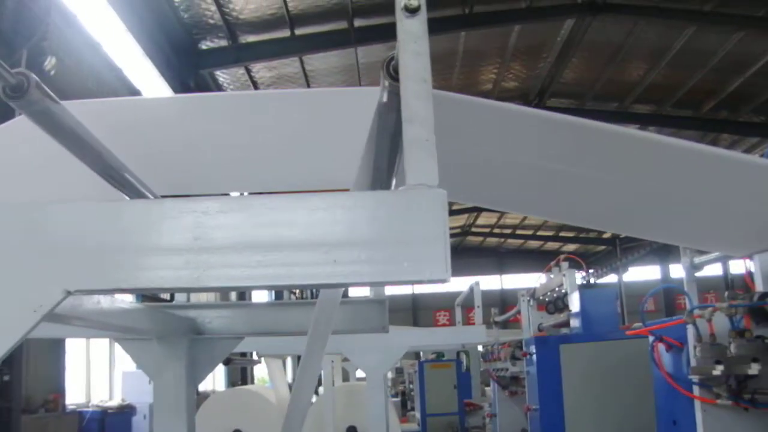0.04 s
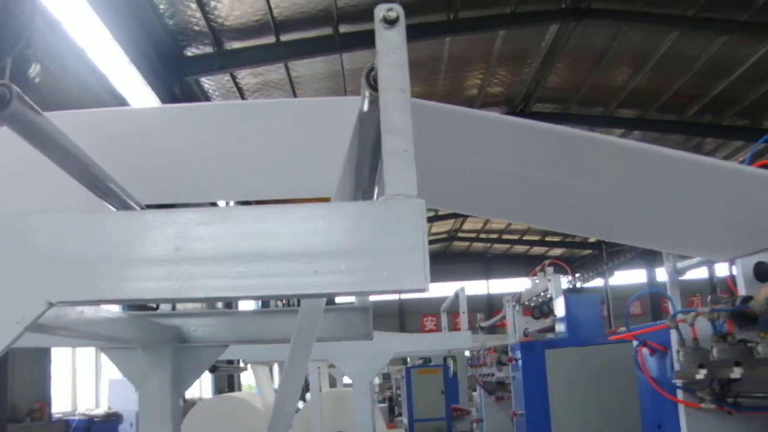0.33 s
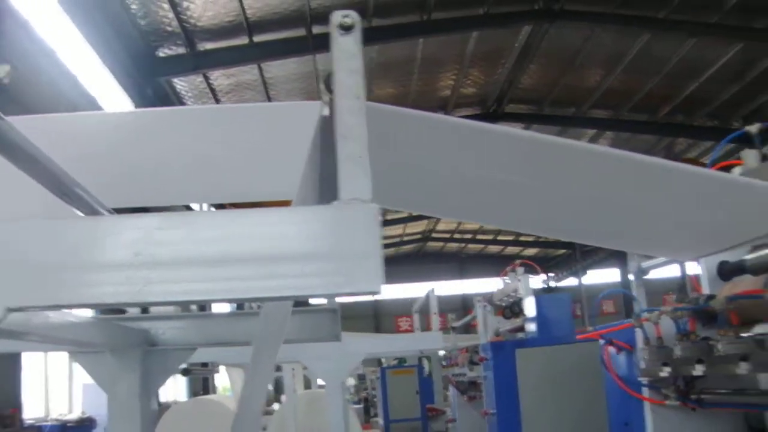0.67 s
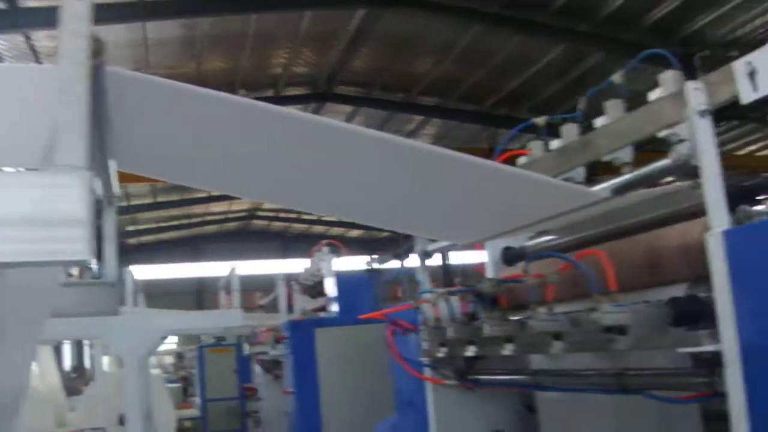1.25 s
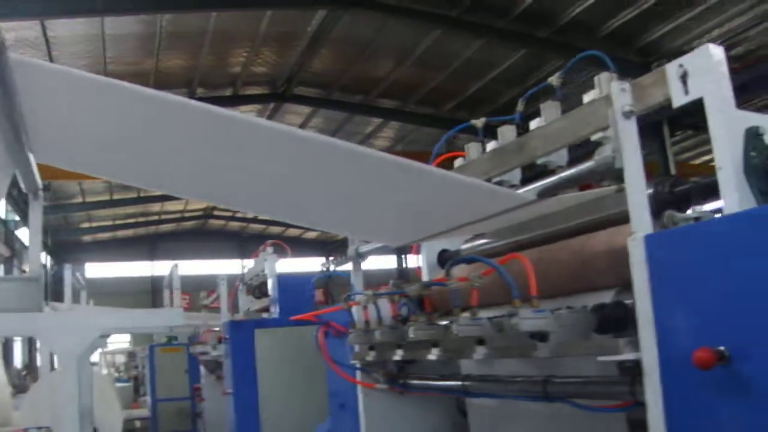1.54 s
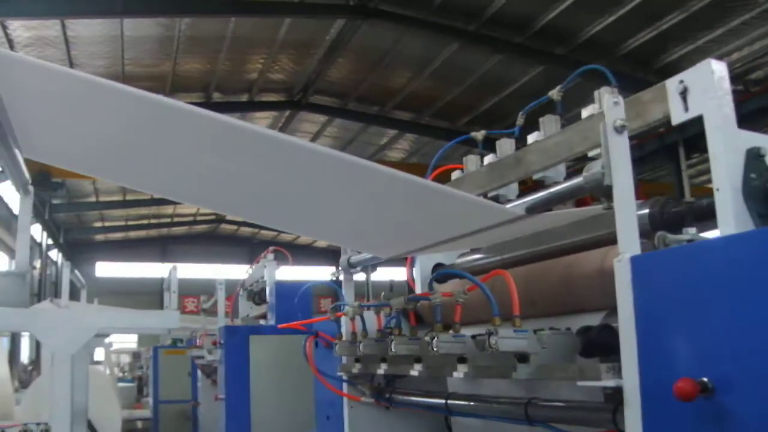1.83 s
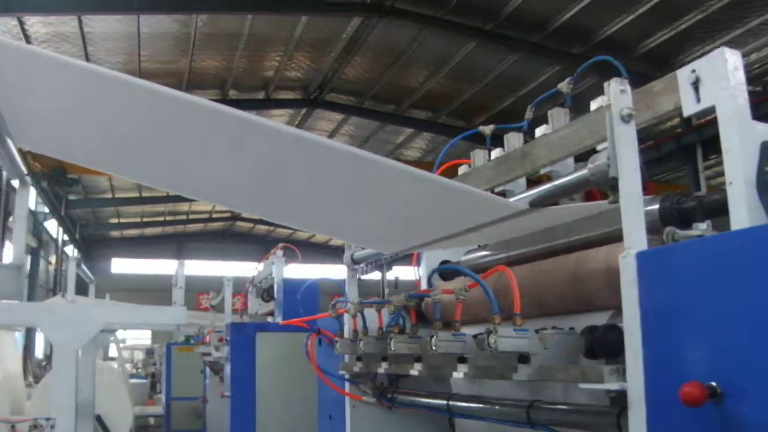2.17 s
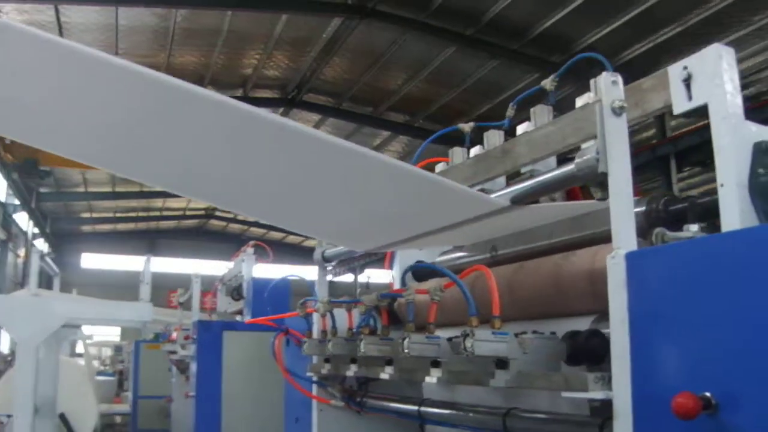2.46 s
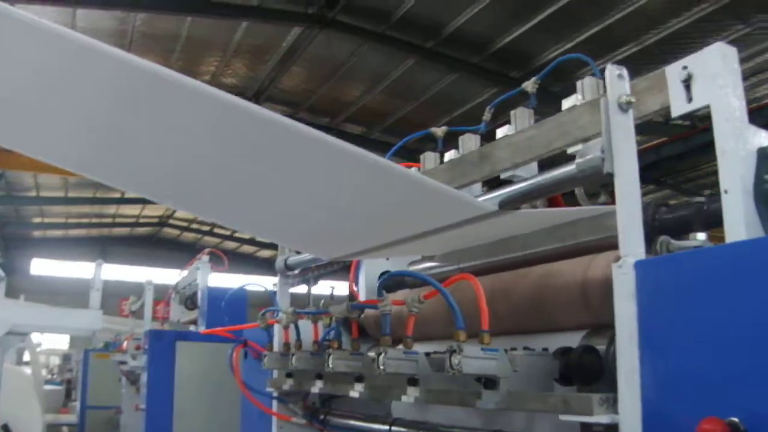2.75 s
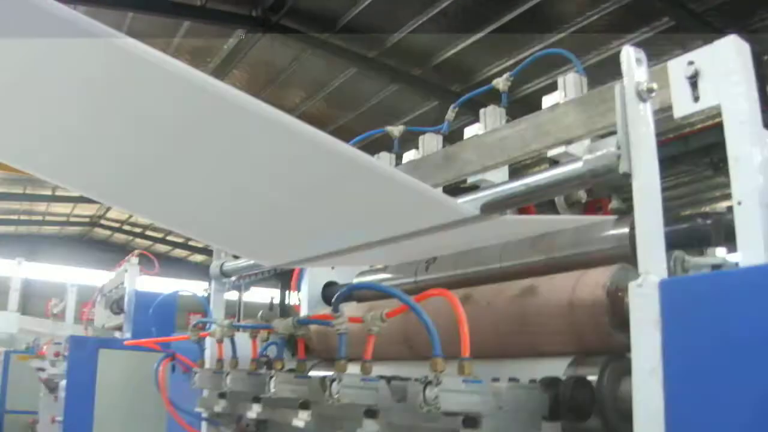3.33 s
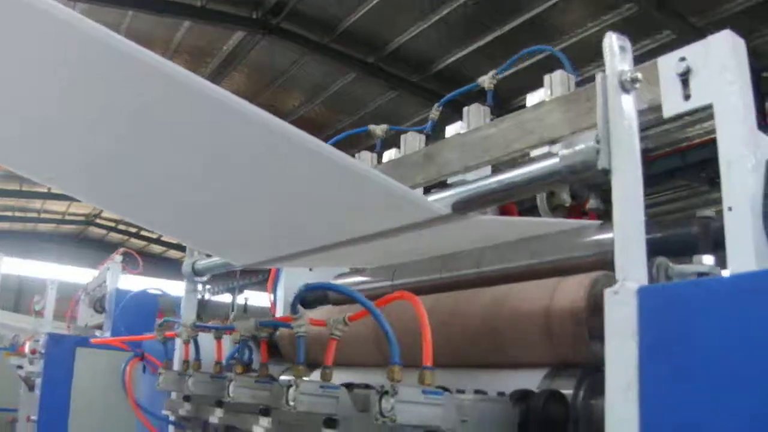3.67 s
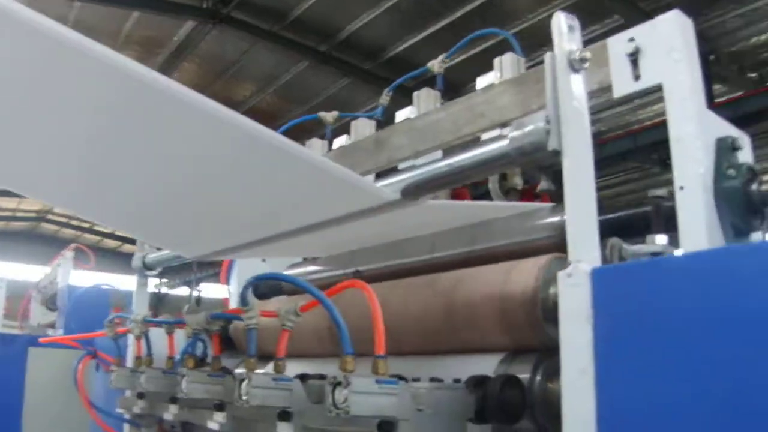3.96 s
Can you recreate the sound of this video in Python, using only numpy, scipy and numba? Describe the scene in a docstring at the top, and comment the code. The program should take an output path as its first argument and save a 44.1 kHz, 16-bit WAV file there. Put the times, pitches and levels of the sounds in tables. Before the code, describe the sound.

A paper processing machine drones in a factory hall throughout, with a low pulsing hum, gear whine and rushing paper that faintly rustles and squeaks. Air valves chirp softly around 1 and 2.9 seconds; one sharp chirp at 1.7 seconds briefly dips the overall level. From about 3 seconds the microphone nears the rollers and the buzz brightens, with small air puffs and a faint tick near 3.5 seconds.

```python
"""A pulsing drone over a steady rush: a tissue machine runs in a factory hall.
The drive pulses three times a shaft turn, and its harmonic buzz brightens as the microphone nears
the rollers. Meshing gears whine, other motors hum, the paper web rushes, rustles and squeaks.
Air valves give tiny chirps and puffs; one sharp chirp makes a gain control duck for a moment."""
import sys
import numpy as np
from scipy import signal
from scipy.fft import rfft, irfft
from scipy.io import wavfile
from scipy.ndimage import map_coordinates
from numba import njit

SR = 44100
rng = np.random.default_rng(int(sys.argv[2]) if len(sys.argv) > 2 else 0)


def transcribe(signal):
    """Save signal, clipped to [-1, 1], as a 16-bit WAV file at the path in sys.argv[1]."""
    frames = np.atleast_2d(signal).T
    limited = np.clip(frames, -1, 1)
    pcm = np.round(limited * 32767).astype(np.int16)
    wavfile.write(sys.argv[1], SR, pcm)


N = 176400

# spectrum of the paper web and the hall (frequency [Hz], relative density [dB])
RUSH_SPECTRUM = [(20, -11), (45, -1), (80, -0.5), (150, 1.5), (300, 1), (430, -2.5), (520, -3), (700, -0.5),
                 (880, -1.5), (1100, -6.5), (1500, -4.5), (2000, -4), (2800, -6), (3400, -8), (3900, -8.5),
                 (4400, -10.5), (5300, -11), (7000, -16.5), (9000, -21), (10500, -21.5), (11600, -21.5),
                 (15500, -34)]
# swells of the rush (time [s], body gain [dB], treble gain [dB])
RUSH_GAIN = [(0, -1, -2), (.19, -1.5, 0), (.32, -1.5, 0.5), (.55, -1.5, -1.5), (.82, 0, -1),
             (1.08, -1.5, -1), (1.3, -0.5, -3), (1.47, -0.5, 2), (1.62, -0.5, 0), (1.9, 2, -0.5),
             (2.1, 1.5, 2), (2.45, 1, 0), (2.7, 1.5, 2.5), (3.08, 1.5, 1.5), (3.25, 3.5, 6.5), (3.55, 2, 2),
             (3.72, 2.5, 1), (3.85, 4, 6), (4, 2, 5)]
# the paper's highest hiss, relative to the treble (time [s], gain [dB])
TOP_HISS_GAIN = [(0, -0.5), (.65, -1), (.85, 2.5), (1.1, -0.5), (1.42, 1), (1.7, 0.5), (2.0, -1.5),
                 (2.15, 2), (2.45, 0), (3.05, -0.5), (3.3, 0.5), (3.65, -1.5), (3.85, 0.5), (4, -0.5)]
# rustles of the paper (start [s], duration [s], crest level [dB])
PAPER_RUSTLES = [(0.163, .06, -37.5), (1.038, .08, -37), (1.45, 0.048, -38.5), (2.287, 0.076, -36),
                 (2.84, 0.052, -40), (3.192, 0.044, -35.5), (3.27, .05, -35)]
# squeaks of the rollers (start [s], duration [s], frequency [Hz], crest level [dB])
ROLLER_SQUEAKS = [(.58, 0.3, 5170, -50), (1.18, 0.2, 11800, -65), (1.79, 0.045, 10080, -50),
                  (1.99, 0.057, 5600, -42), (2.14, .15, 12550, -56), (2.59, .07, 4800, -45),
                  (2.74, .07, 4700, -47), (3.456, .06, 3990, -40), (3.59, 0.076, 10300, -45)]
# dry tick of the mechanism (start [s], initial level [dB])
MECHANISM_TICKS = [(3.6147, -27)]
# valve chirps (start [s], initial frequency [Hz], peak level [dB])
VALVE_CHIRPS = [(1.006, 9050, -28.5), (1.016, 8500, -28.5), (1.021, 11600, -33), (1.641, 8300, -33),
                (1.657, 8840, -7.5), (2.861, 9200, -26), (2.869, 8500, -23.5), (2.8745, 11600, -26)]
# puffs of air (start [s], duration [s], centre [Hz], bandwidth [Hz], crest level [dB])
AIR_PUFFS = [(0.132, 0.037, 5960, 4000, -41), (1.635, 0.014, 7600, 3000, -36.5),
             (2.262, 0.028, 8000, 5000, -41.5), (3.426, 0.022, 5800, 2800, -33),
             (3.44, 0.032, 8000, 5500, -36.5)]
# tones of neighbouring motors and rollers (frequency [Hz], base level [dB])
MOTOR_TONES = [(69.8, -49), (96.5, -50.5), (120.5, -55.5), (193.2, -48.5), (264, -54), (340, -53.5),
               (888.4, -46.5), (913.2, -47)]
# gear tones, in clusters spaced by the shaft rate (frequency [shaft rates], base level [dB])
MESH_TONES = [(107, -64.5), (111, -49), (112, -51), (113, -53.5), (114, -51), (152, -59), (162, -55),
              (168, -65.5)]
# swells of the gear tones (time [s], gain [dB])
MESH_GAIN = [(0, -3), (.3, -2), (.7, 1.5), (1.25, -1), (1.6, -3), (1.95, 4.5), (2.4, -1.5), (2.7, -1),
             (3.2, 5), (3.45, -2), (3.8, 3.5), (4, -6)]
# the brightest whine and its sidebands (frequency [shaft rates], relative level [dB])
WHINE_TONES = [(119, -5), (120, 1.5), (121, -10), (122, -9.5)]
# swells of that whine (time [s], reference level [dB])
WHINE_SWELL = [(0, -51.5), (.9, -53.5), (1.05, -48.5), (1.28, -45.5), (1.6, -53), (1.9, -44.5), (2.15, -46),
               (2.65, -42), (3.15, -47), (3.45, -47), (3.8, -43.5), (4, -47)]
# path of the microphone (time [s], place [0 far, 1 midway, 2 near])
MIC_PATH = [(0, 0.035), (1.7, 0.1), (2.6, 0.77), (3.05, 0.8), (3.3, 2), (4, 2)]
# the drive's harmonics at those three places (frequency [pulse rates], relative level [dB])
FAR_HARMONICS = [(1, -30.5), (2, -16), (3, -28.5), (4, 0), (5, -32), (6, -33), (7, -39), (8, -29), (9, -41),
                 (10, -23), (11, -25), (12, -25), (13, -30), (14, -35), (15, -65)]
MIDWAY_HARMONICS = [(1, -24), (2, -12), (3, -28), (4, 0), (5, -27.5), (6, -36), (7, -45), (8, -23.5),
                    (9, -17.5), (10, -17.5), (11, -15), (12, -22), (13, -22.5), (14, -21), (15, -38)]
NEAR_HARMONICS = [(1, -22), (2, -5), (3, -20), (4, 0), (5, -25), (6, -23.5), (7, -31), (8, -18.5), (9, -18),
                  (10, -23), (11, -9), (12, -18), (13, -20), (14, -28), (15, -27)]
# harmonics 2 (hum) and 4 (drone) swell and fade in the hall's standing waves (time [s], level [dB])
HUM_LEVEL = [(0, -28), (1.05, -30.5), (1.25, -31.5), (1.5, -29.5), (2.2, -29.5), (2.85, -27), (3.0, -28.5),
             (3.18, -25.5), (3.55, -26.5), (3.8, -23), (4, -24)]
DRONE_LEVEL = [(0, -13), (.7, -13.4), (.92, -14), (1.1, -12.5), (1.42, -14.5), (1.6, -16.5), (2.0, -12),
               (2.17, -13.5), (2.33, -13.5), (2.62, -15.5), (2.78, -18), (2.92, -17.5), (3.45, -20.5),
               (3.62, -19.5), (3.75, -17.5), (4, -19)]

SHAFT_HZ, PULSES_PER_TURN = 24.127, 3
TIME = np.arange(N) / SR
BIN_HZ = np.arange(N // 2 + 1) * SR / N


def undb(db):
    """Amplitude grows tenfold for every 20 dB."""
    return 10 ** (np.asarray(db) / 20)


def unit_rms(x):
    """Normalisation to unit power."""
    return x / np.sqrt(np.mean(x ** 2))


def curve(table):
    """Linear interpolation of a table's columns over time."""
    at, *columns = np.array(table, float).T
    return np.squeeze([np.interp(TIME, at, column) for column in columns])


def drift(rate_hz):
    """Slow random modulation: a cubic spline through random knots, spread near 1."""
    knots = rng.standard_normal(int(rate_hz * N / SR) + 8)
    coarse_time = TIME[::100]
    spline = map_coordinates(knots, [coarse_time * rate_hz + 2 + rng.random()], order=3)
    return 1.13 * np.interp(TIME, coarse_time, spline)


def band_noise(hz, width_hz):
    """Band-pass filtering: white noise under a bell-shaped response, rms 1."""
    rolloff = 1 + (3.1 * (BIN_HZ - hz) / width_hz) ** 4
    return unit_rms(irfft(rfft(rng.standard_normal(N)) / rolloff, N))


def swish(start, length, hz, width_hz, db):
    """A noise burst: one band swells and fades under a half-sine envelope."""
    envelope = np.sin(np.pi * np.clip((TIME - start) / length, 0, 1))
    return undb(db) * envelope * band_noise(hz, width_hz)


def tone(cycles, db, flutter_db, wander_rad):
    """Amplitude and phase modulation: a partial wavers in the hall."""
    amplitude = np.sqrt(2) * undb(db + flutter_db * drift(6.12))
    return amplitude * np.sin(2 * np.pi * cycles + wander_rad * drift(4.066))


@njit
def peak_hold(x, release_s):
    """Peak detection: an instant rise and an exponential release."""
    fall = np.exp(-1 / (release_s * SR))
    out, held = np.empty(len(x)), 0.
    for i in range(len(x)):
        held = max(x[i], held * fall) + 1e-18
        out[i] = held
    return out


def hall(direct, t60_s=0.7, tail_db=-33):
    """Reverberation: a diffuse, exponentially decaying tail joins the direct sound."""
    tail = rng.standard_normal(N) * np.exp(-np.log(1000) * TIME / t60_s)
    return direct + undb(tail_db) * signal.fftconvolve(direct, tail / np.linalg.norm(tail))[:N]


def paper_web(shaft_turns, base_db=-33, body_hz=3060, treble_hz=8000, top_hiss_hz=10000):
    """Modulated noise of running paper: third-octave bands swell together and flicker alone."""
    freqs = np.maximum(BIN_HZ, 1)
    at_hz, density_db = np.array(RUSH_SPECTRUM).T
    colour = undb(np.interp(np.log(freqs), np.log(at_hz), density_db))
    noise = unit_rms(irfft(rfft(rng.standard_normal(N)) * colour, N))
    spectrum = rfft(noise)
    body_db, treble_db = curve(RUSH_GAIN)
    swell_db = 0.48 * drift(14)
    rush = np.zeros(N)
    for hz in 20 * 2 ** (np.arange(30) / 3):
        triangle = np.maximum(1 - 3 * abs(np.log2(freqs / hz)), 0)
        band = irfft(spectrum * triangle, N)
        if hz > top_hiss_hz:
            band *= undb(curve(TOP_HISS_GAIN))
        treble_share = np.interp(np.log(hz), np.log([body_hz, treble_hz]), [0, 1])
        band_db = (1 - treble_share) * body_db + treble_share * treble_db
        flicker_db = 0.71 * drift(22.06)
        rush += band * undb(band_db + swell_db + flicker_db)
    roller_pulse = 1 + 0.064 * np.sin(2 * np.pi * shaft_turns)
    return undb(base_db) * rush * roller_pulse


def rustles(hz=2100, width_hz=2240):
    """Flutter: the web radiates brief bursts of broadband noise."""
    return sum(swish(start, length, hz, width_hz, db) for start, length, db in PAPER_RUSTLES)


def squeaks(width_hz=320):
    """Friction: paper slipping on the rollers gives brief narrow-band noise."""
    return sum(swish(start, length, hz, width_hz, db) for start, length, hz, db in ROLLER_SQUEAKS)


def ticks(decay_s=0.00026):
    """A damped transient: bright noise dies so fast that it is heard as a click."""
    envelope = sum(undb(db) * (TIME >= start) * np.exp(-abs(TIME - start) / decay_s)
                   for start, db in MECHANISM_TICKS)
    return envelope * band_noise(hz=12900, width_hz=6400)


def valves(attack_s=0.0011, decay_s=0.0023, sag_hz_per_s=77000):
    """Flow noise: escaping air makes short, linearly falling chirps and softer puffs."""
    chirps = np.zeros(N)
    for start, hz, db in VALVE_CHIRPS:
        age = np.clip(TIME - start, 0, 0.06)
        envelope = np.minimum(age / attack_s, 1) * np.exp(-np.maximum(age - attack_s, 0) / decay_s)
        cycles = hz * age - sag_hz_per_s * age ** 2 / 2
        roughness_rad = 0.59 * band_noise(hz=0, width_hz=1600)
        chirps += undb(db) * envelope * np.sin(2 * np.pi * cycles + roughness_rad)
    return chirps + sum(swish(*puff) for puff in AIR_PUFFS)


def motors(throb_hz=861.3, far_db=-48, near_db=-35.5):
    """Beats: parts turn at their own speeds; one tone throbs against the drive's twelfth harmonic."""
    throb_db = np.interp(curve(MIC_PATH), [0, 2], [far_db, near_db])
    throb = tone(throb_hz * TIME, throb_db, flutter_db=0.7, wander_rad=0.19)
    rush_body_db, _ = curve(RUSH_GAIN)
    return throb + sum(tone(hz * TIME, db + 0.49 * rush_body_db, flutter_db=4.8, wander_rad=0.35)
                       for hz, db in MOTOR_TONES)


def gears(shaft_turns):
    """Sidebands: meshing teeth whine in tones one shaft rate apart, and so throb once a turn."""
    mesh_db, whine_db = curve(MESH_GAIN), curve(WHINE_SWELL)
    mesh = sum(tone(order * shaft_turns + rng.random(), db + mesh_db, flutter_db=0.5, wander_rad=0.54)
               for order, db in MESH_TONES)
    whine = sum(tone(order * shaft_turns, db + whine_db, flutter_db=0.4, wander_rad=0.3)
                for order, db in WHINE_TONES)
    return mesh + whine


def drive(shaft_turns, far_db=-16.5, midway_db=-19.5, near_db=-23.5):
    """Periodic pulses form a harmonic series: a strong drone, a hum an octave below and a buzz."""
    place = curve(MIC_PATH)
    main_db = {2: curve(HUM_LEVEL), 4: curve(DRONE_LEVEL)}
    out = np.zeros(N)
    for (k, far), (_, midway), (_, near) in zip(FAR_HARMONICS, MIDWAY_HARMONICS, NEAR_HARMONICS):
        cycles = k * PULSES_PER_TURN * shaft_turns
        if k in main_db:
            out += tone(cycles, main_db[k], flutter_db=0.23, wander_rad=0.042)
        else:
            db = np.interp(place, [0, 1, 2], [far + far_db, midway + midway_db, near + near_db])
            offset_cycles = rng.uniform(-0.4095, 0.3024)  # smears each pulse
            out += tone(cycles + offset_cycles, db, flutter_db=1.0, wander_rad=0.43)
    return out


def scene():
    """Superposition: one wandering shaft paces drive, gears and web; brief sounds reverberate."""
    shaft_hz = SHAFT_HZ * (1 + 0.000998 * drift(7))
    shaft_turns = np.cumsum(shaft_hz) / SR
    steady = drive(shaft_turns) + gears(shaft_turns) + motors() + paper_web(shaft_turns)
    brief = valves() + squeaks() + ticks() + rustles()
    return (steady + hall(brief))[None]


def record(dry, threshold_db=-20, attack_s=0.0006, cutoff_hz=15700):
    """Automatic gain control: treble peaks duck the level, which recovers in two stages; a low-pass."""
    highpass = signal.butter(2, 4000, "high", fs=SR, output="sos")
    treble = signal.sosfilt(highpass, dry[0])
    excess_db = np.maximum(20 * np.log10(abs(treble) + 1e-9) - threshold_db, 0)
    quick_db = 0.64 * peak_hold(excess_db, release_s=0.021)
    slow_db = 0.46 * peak_hold(excess_db, release_s=0.36)
    pole = np.exp(-1 / (attack_s * SR))
    duck_db = signal.lfilter([1 - pole], [1, -pole], quick_db + slow_db)
    lowpass = signal.ellip(10, 0.2, 80, cutoff_hz, fs=SR, output="sos")
    return signal.sosfilt(lowpass, dry * undb(-duck_db))


dry = scene()
out = record(dry)
transcribe(out)
```